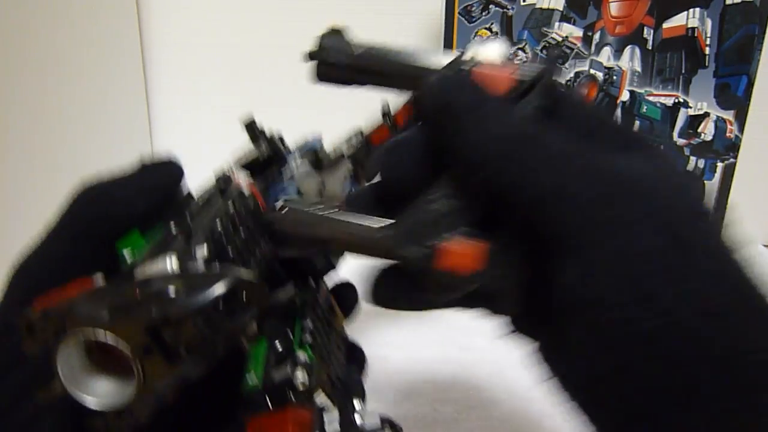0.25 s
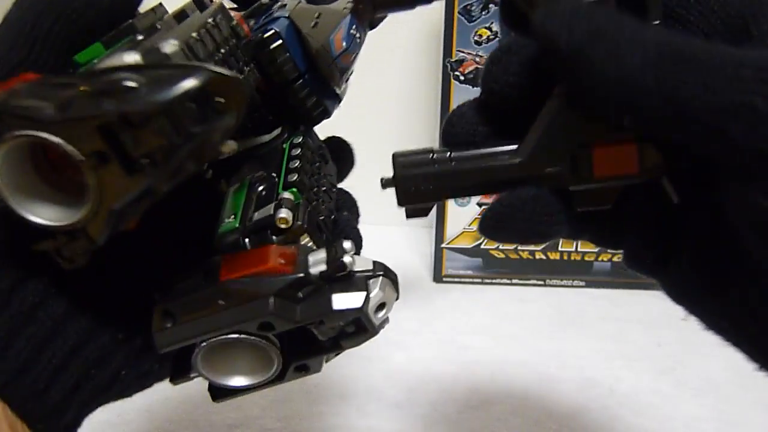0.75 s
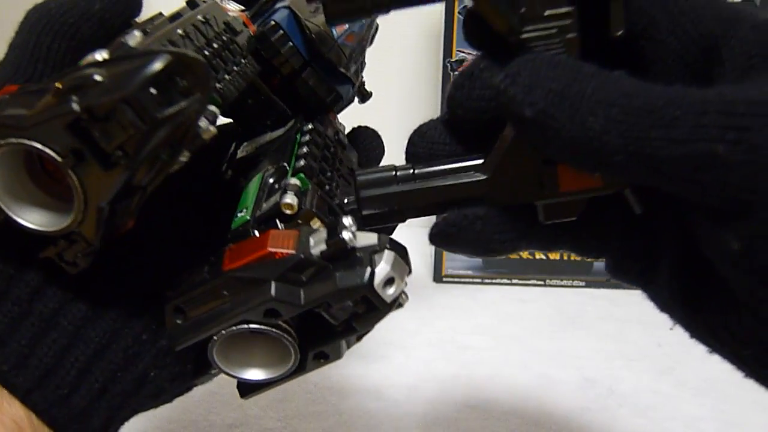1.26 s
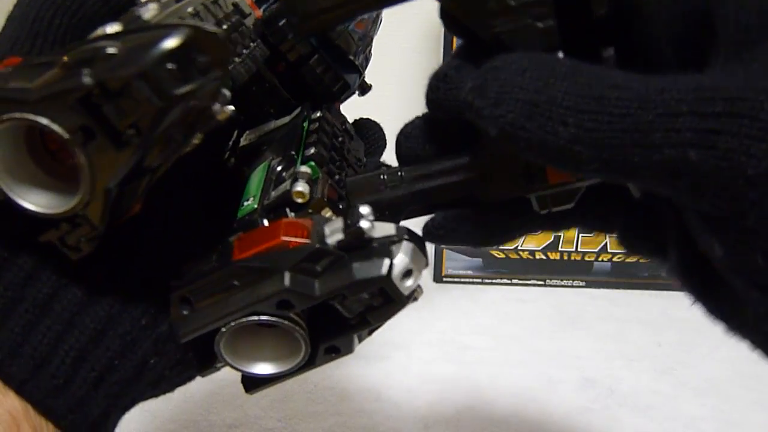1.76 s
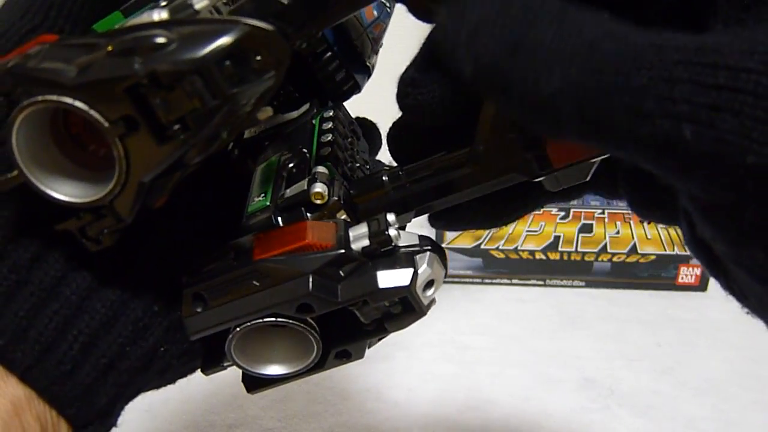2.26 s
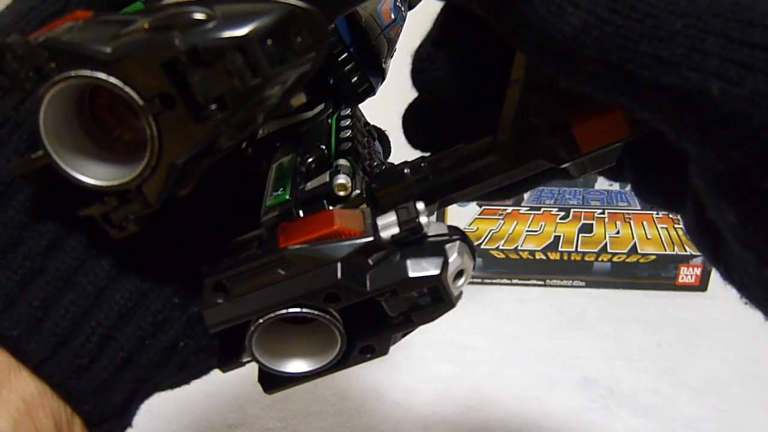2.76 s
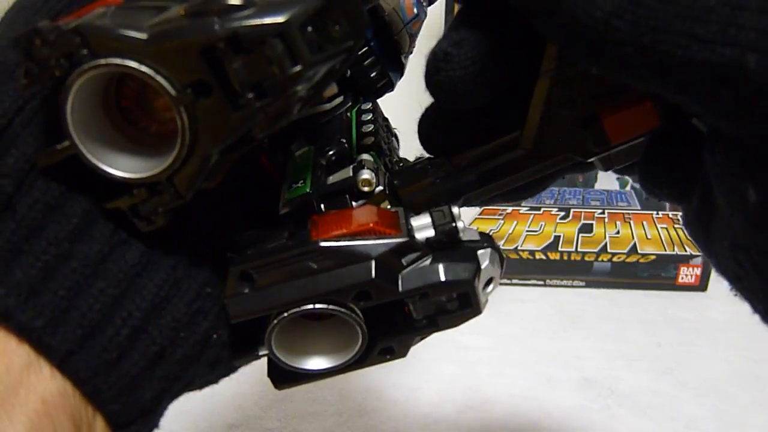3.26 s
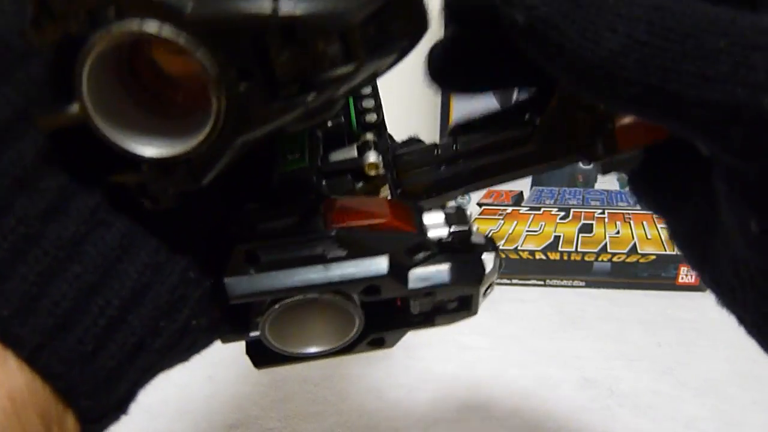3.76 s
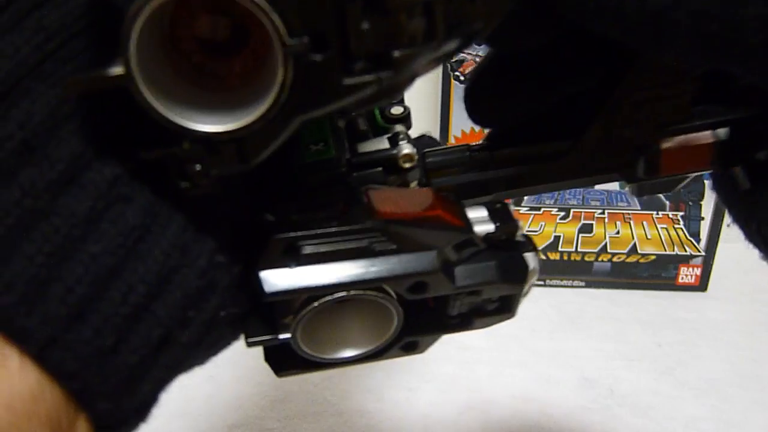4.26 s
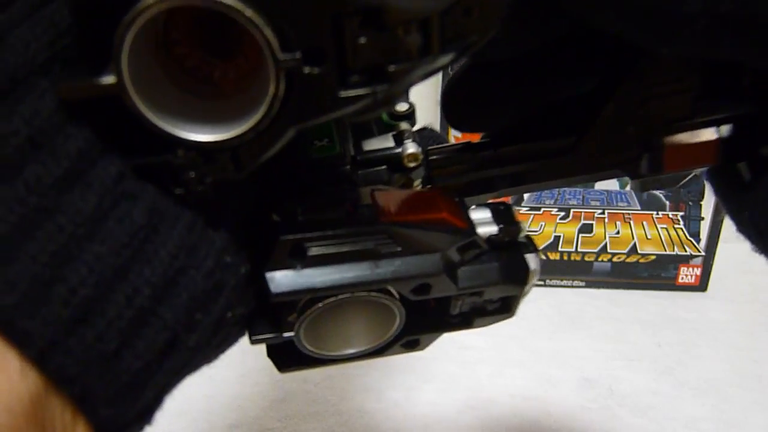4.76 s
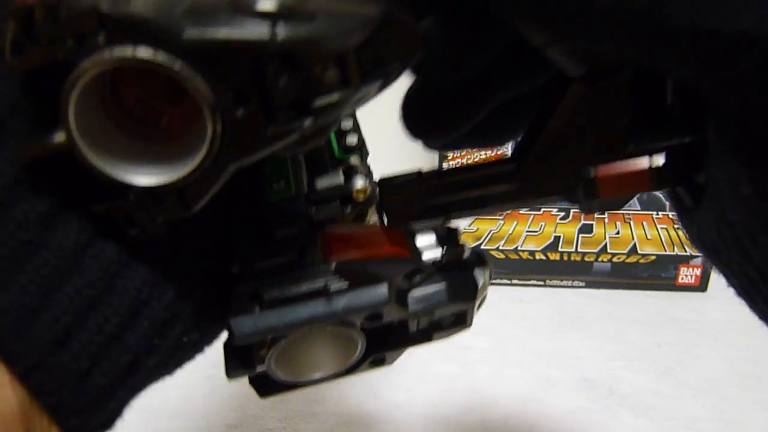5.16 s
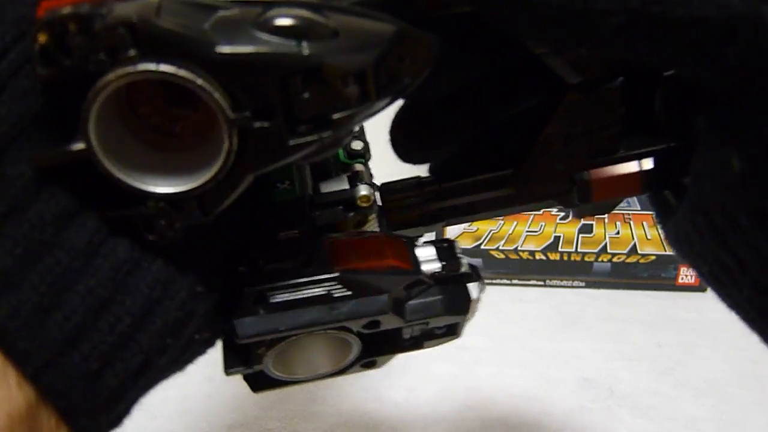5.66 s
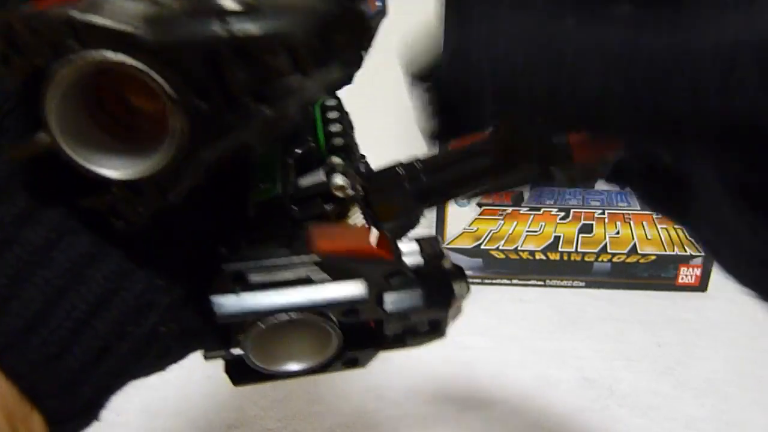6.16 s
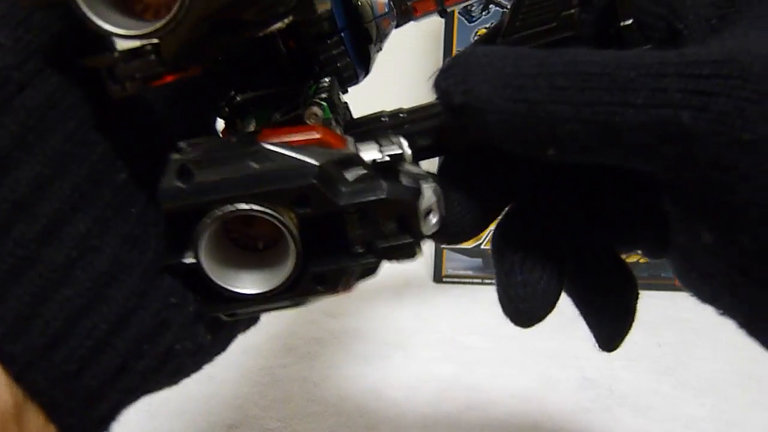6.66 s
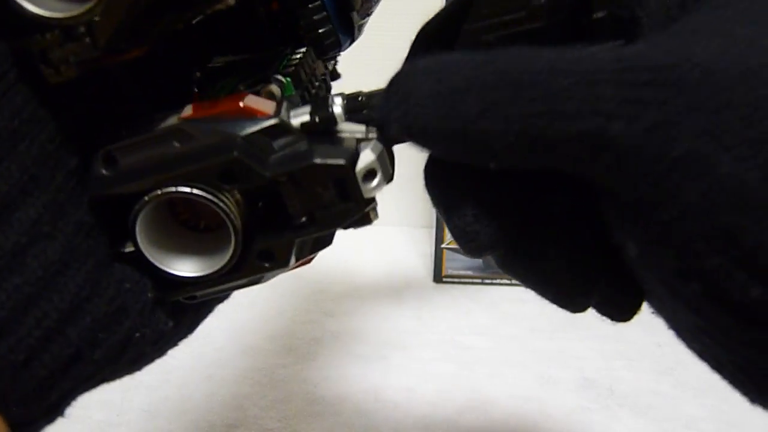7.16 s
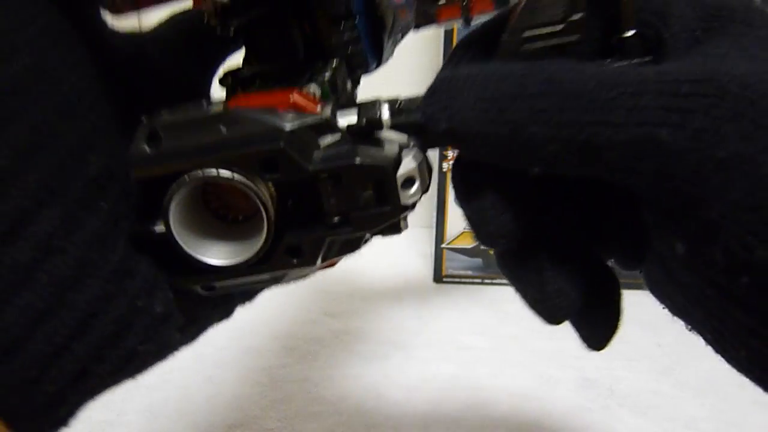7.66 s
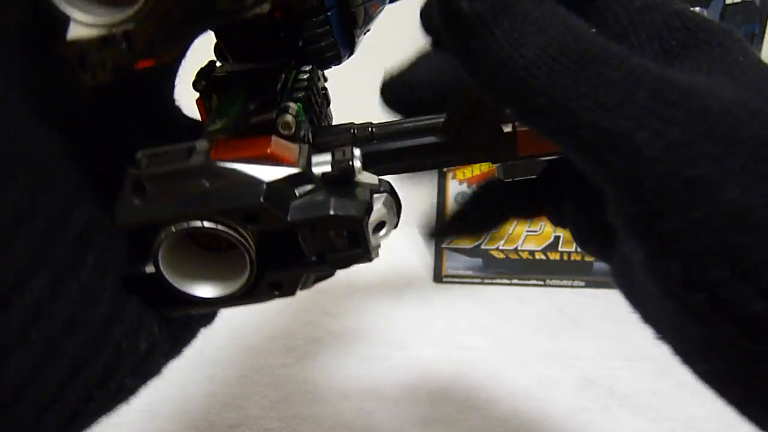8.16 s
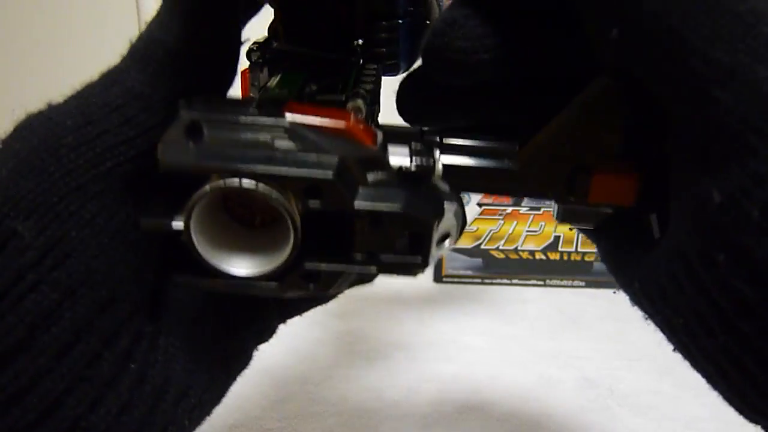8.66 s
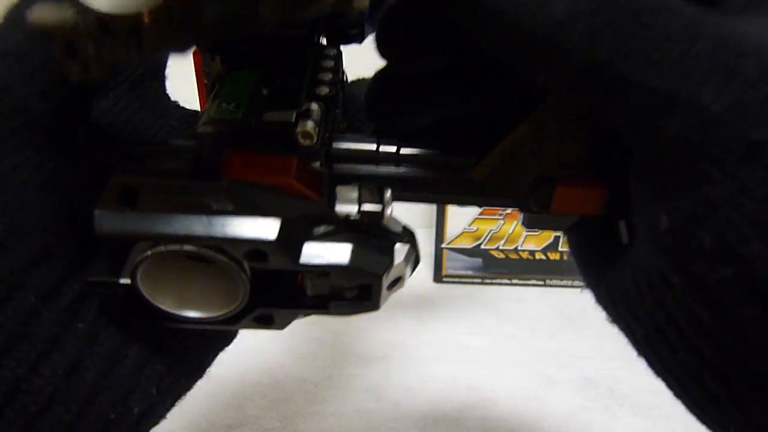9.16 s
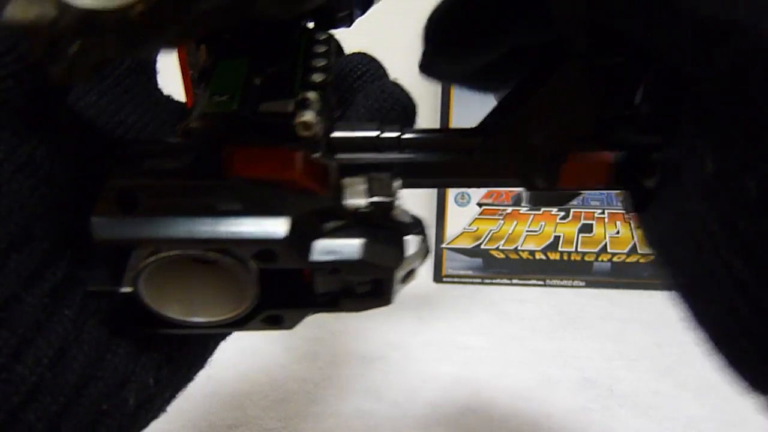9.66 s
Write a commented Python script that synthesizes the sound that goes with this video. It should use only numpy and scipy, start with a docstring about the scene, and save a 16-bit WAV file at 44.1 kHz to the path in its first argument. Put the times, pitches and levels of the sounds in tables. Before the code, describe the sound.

A hard plastic toy is fitted together by gloved hands, close to the microphone in a quiet room with little echo. It opens with a quick cluster of light clicks, then only scattered ticks, with faint swishes of knitted gloves around 0.5 and 2 seconds. From about 2.5 seconds pegs, hinges and panels click and snap in dense, irregular runs, each short and bright with a slightly hollow knock. Loose parts rattle, plastic rubs on plastic, and a few hard pushes add soft thumps. A sharp snap comes near 3 seconds, and the loudest, with a dull thump, at about 5.7 seconds. More strong snaps follow around 6.7 and 7.3 seconds. The handling thins out from 7.7 to 8.4 seconds, then the clicking resumes until about 10 seconds. Underneath, a faint muffled rumble swells now and then over steady room hush.

```python
"""A hard plastic toy is fitted together by gloved hands, close to a mono microphone in a quiet room.
Pegs, hinges and panels click and snap: each blow rings small stiff parts and a hollow shell, with
a bright crack on top. Hard pushes thump through the hands, loose parts rattle, plastic rubs on
plastic and knitted gloves swish. A muffled low rumble swells now and then over the room's hush."""
import sys
import numpy as np
from scipy import signal
from scipy.fft import rfft, irfft
from scipy.io import wavfile
from scipy.ndimage import uniform_filter1d

SR = 44100
rng = np.random.default_rng(int(sys.argv[2]) if len(sys.argv) > 2 else 0)


def transcribe(signal):
    """Save signal, clipped to [-1, 1], as a 16-bit WAV file at the path in sys.argv[1]."""
    frames = np.atleast_2d(signal).T
    limited = np.clip(frames, -1, 1)
    pcm = np.round(limited * 32767).astype(np.int16)
    wavfile.write(sys.argv[1], SR, pcm)


N = 437472

# How busy the hands are. Each row: time in seconds, level in dB, share of rattle against rub (0 to 1).
HANDLING_MOVES = [(0.0, -53.5, .6), (0.19, -50, 0.74), (0.47, -59.5, 0.07), (1.85, -58.5, 0.33),
                  (2.4, -55.5, 0.32), (2.8, -57.5, 0.24), (3.45, -44.5, 0.6), (3.7, -51, 0.48),
                  (4.6, -54, 0.57), (4.95, -39, 0.64), (5.33, -58, .4), (5.7, -40.5, 0.7), (5.85, -64, 0.4),
                  (6.08, -43, 0.5), (6.19, -53, 0.5), (6.3, -43.5, 0.56), (6.57, -49, .3), (6.95, -50, 0.5),
                  (7.13, -41, 1), (7.66, -44.5, 0.32), (7.79, -59, 0.44), (8.67, -49, 0.3),
                  (9.36, -55, 0.55), (9.92, -47, 0.4)]
# The tone of plastic rubbing on plastic. Each row: frequency in Hz, relative level in dB.
RUB_SPECTRUM = [(300, -55), (700, 0.5), (1300, 0.5), (3000, -5), (5000, -11.5), (9000, -13), (16000, -16.5)]
# The ring of small stiff parts. Each row: pitch in Hz, relative level in dB, 60 dB decay in seconds.
PART_RINGS = [(2580, 7, 0.0072), (3250, 3, 0.032), (3430, -2, 0.0061), (3950, -7, 0.075), (4250, -2, 0.074),
              (4520, -1, 0.034), (5000, -5, 0.062), (5330, 6, 0.0082), (5800, -3, 0.036), (6155, -4, 0.02),
              (6645, 2, 0.021), (7260, 7.5, 0.0065), (8184, 11, 0.0042)]
# The ring of hollow shells. Each row: pitch in Hz, relative level in dB, 60 dB decay in seconds.
SHELL_RINGS = [(650, -19, 0.14), (780, -3.5, 0.038), (960, -2.5, 0.11), (1150, -10, 0.069),
               (1352, 3.5, 0.033), (1530, 3.5, 0.11), (1815, 5.5, 0.069)]
# The tone of the quiet room. Each row: frequency in Hz, relative level in dB.
HUSH_SPECTRUM = [(12, -31), (20, -8), (53, -0.5), (156, -0.5), (251, 2), (305, 3), (428, -3), (465, -2),
                 (729, -3), (1950, -14), (2120, -20.5), (3330, -29), (15200, -24), (16500, -72)]
# Plastic clicks. Each row: start in seconds, level in dB, ring pitch in Hz, shell level in dB against
# the ring, shell pitch in Hz, crack level in dB against the ring, nominal decay in seconds.
CLICK_HITS = [(0.042, -29.5, 4200, 3, 1350, 0, 0.015), (0.0498, -30, 3430, -3, 1240, 0, 0.11),
              (0.078, -20.5, 5150, -10, 1350, -6, 0.021), (0.1372, -25.5, 5500, 2, 1150, -12, 0.057),
              (0.1592, -22.5, 5800, -24, 1110, -3, 0.036), (0.164, -25.5, 4520, -13, 1600, -11, 0.067),
              (0.182, -18, 7640, -7, 1290, 3, 0.02), (0.1913, -25, 3660, -26, 1260, -3, 0.048),
              (0.306, -31, 3520, -19, 1450, -6, 0.016), (0.4961, -29.5, 3950, -13, 970, -8, 0.0049),
              (0.796, -30, 3760, -28, 650, -14, 0.029), (1.435, -18.5, 4780, -16, 1240, -10, 0.017),
              (1.444, -28.5, 2880, -15, 1520, -13, 0.036), (1.558, -27.5, 3950, -4.5, 1610, -18, 0.051),
              (2.0368, -16.5, 4320, -18.5, 1490, 1.5, 0.0055), (2.3733, -25, 2890, -21, 1420, -11, 0.017),
              (2.4999, -20, 3870, -22, 1050, -10, 0.009), (2.5078, -24, 3020, -20, 1420, -23, 0.015),
              (2.551, -24, 3880, -22, 915, -7, 0.016), (2.5763, -28.5, 3780, -15, 650, -23, 0.016),
              (2.6117, -14, 5700, -12.5, 1230, -10, 0.022), (2.6442, -19.5, 5160, -13, 1010, 5, 0.0091),
              (2.6493, -20.5, 7100, -16, 1020, -10, 0.029), (2.9032, -28, 4900, -15, 1490, 2, 0.048),
              (2.9076, -17.5, 4440, -25, 1260, -3, 0.0065), (2.9391, -6, 5800, -13.5, 743, -3, 0.03),
              (2.9906, -16.5, 5970, -32, 1530, 3, 0.0066), (3.0086, -20, 2590, -14, 1530, -30, 0.044),
              (3.016, -26, 4960, -11, 1430, -8, 0.016), (3.0228, -18, 5800, -30, 1500, -4, 0.02),
              (3.0419, -15, 6300, -31, 1350, 1.5, 0.0041), (3.1098, -22.5, 5680, -14, 1520, -10, 0.012),
              (3.1173, -21.5, 7460, -9, 1320, -12, 0.016), (3.1256, -12, 6050, -24, 1070, -9, 0.0068),
              (3.138, -22.5, 4000, -15, 1460, 1, 0.012), (3.172, -20, 2550, -10, 1140, -11, 0.0066),
              (3.221, -20, 6000, -22, 1470, 1, 0.011), (3.255, -20, 4920, -9, 1060, -9, 0.017),
              (3.2696, -18, 6300, -13, 705, -4, 0.013), (3.2944, -12.5, 2970, -21, 1240, 1, 0.0082),
              (3.3319, -15, 4840, -15, 1410, -4, 0.014), (3.3544, -23.5, 6270, -18, 1390, 2, 0.012),
              (3.3776, -32, 4010, -29, 1200, 4, 0.014), (3.3944, -13, 3250, -12.5, 725, -42, 0.025),
              (3.4403, -20.5, 6000, -21, 1460, -4, 0.0064), (3.4539, -11, 4030, -21, 1530, -1, 0.0031),
              (3.472, -17, 4970, -9.5, 1530, -13, 0.026), (3.492, -14, 4840, -17, 1250, -7, 0.007),
              (3.5086, -19.7, 4760, -15, 1400, -7, 0.008), (3.5196, -21, 4870, -14, 1450, -9, 0.0077),
              (3.5265, -19, 6800, -27, 1400, -2, 0.0083), (3.531, -23, 7500, -20, 1570, -10, 0.017),
              (3.5624, -17.5, 3880, -35, 1450, 3.5, 0.0075), (3.5674, -19.5, 3050, -15, 1410, -9, 0.014),
              (3.5854, -24, 4460, -8.5, 1500, -9, 0.024), (3.6, -6.5, 7700, -28, 1290, -12, 0.0085),
              (3.609, -10, 3540, -28, 810, -14, 0.0074), (3.6171, -13, 5800, -27, 780, -0.5, 0.006),
              (3.622, -19.5, 5460, -24, 780, -2, 0.0074), (3.6261, -22, 5460, -19, 1280, -12, 0.025),
              (3.6714, -16.5, 3950, -14.5, 1080, -0.5, 0.017), (3.7317, -31, 5140, -4, 1280, -12, 0.019),
              (3.8574, -33.5, 4540, -5, 640, -20, 0.056), (3.8834, -29, 5000, -0.5, 1650, -12, 0.041),
              (3.893, -11.5, 4880, -16, 960, -6, 0.015), (3.9024, -12, 6440, -12.5, 1100, -16, 0.023),
              (3.9695, -14.5, 4670, -14, 910, -20, 0.015), (3.983, -21.5, 5800, -7.5, 1020, -8, 0.014),
              (4.0591, -26, 6000, -5.5, 1060, -9, 0.014), (4.223, -34, 3260, -4.5, 960, -28, 0.0091),
              (4.2926, -42, 6060, -17, 690, 12, 0.006), (4.3641, -15, 4900, -15.5, 1210, -4, 0.0069),
              (4.4096, -21, 7100, -14, 1290, -17, 0.014), (4.464, -8.5, 5370, -29, 1370, -11.5, 0.0061),
              (4.501, -20, 3020, -13.5, 1070, -1.5, 0.036), (4.533, -20, 2800, -6.5, 1360, -7, 0.02),
              (4.5934, -20, 5000, -15.5, 1440, -5, 0.0089), (4.6261, -19.5, 4900, -7.5, 1240, -6, 0.02),
              (4.6367, -10.2, 4900, -22, 1510, -0.5, 0.018), (4.6782, -26.5, 4080, -15, 1350, -3, 0.013),
              (4.7056, -11, 5700, -41, 690, -8, 0.0043), (4.7469, -19.5, 6700, -26, 1320, -3, 0.005),
              (4.7577, -20, 7660, -13.5, 1080, -11, 0.022), (4.781, -20, 4440, -14, 825, -8, 0.0049),
              (4.8044, -14.5, 5400, -28, 615, -9, 0.0069), (4.825, -26, 5560, -7, 1390, -5, 0.013),
              (4.8455, -25.5, 3500, -6, 600, -12, 0.012), (4.905, -22.5, 6200, -11, 1300, -5, 0.011),
              (4.937, -11, 4930, -19, 800, -12, 0.0057), (4.9403, -15, 4030, -16.5, 930, -15, 0.006),
              (4.944, -22, 5000, -10, 1250, -7, 0.013), (4.9852, -16, 3430, -23, 600, 0, 0.0058),
              (4.993, -26, 4890, -5.5, 850, -5, 0.027), (5.055, -27, 4400, -6.5, 606, 5.5, 0.013),
              (5.0736, -13, 3950, -30, 1080, -9, 0.0074), (5.0756, -24, 4900, -14, 1080, -13, 0.029),
              (5.0937, -26.5, 4070, -4.5, 676, -12, 0.031), (5.116, -25, 5000, -10, 1190, -10, 0.031),
              (5.197, -19, 4030, -9.5, 1080, -6, 0.046), (5.205, -17, 6430, -9, 1400, -5, 0.03),
              (5.2108, -20.5, 3430, -12, 1430, -11, 0.035), (5.2421, -17.5, 7700, -19, 1180, -16, 0.0089),
              (5.3017, -26.0, 5000, -19, 800, -15, 0.012), (5.3126, -16.5, 5440, -32, 1450, -11, 0.02),
              (5.32, -20, 4200, -18, 1500, -3, 0.0089), (5.3307, -24.5, 5300, -13, 1250, -5, 0.01),
              (5.3575, -25, 5030, -14, 930, -1, 0.0082), (5.37, -16, 5800, -9.5, 1030, -5, 0.019),
              (5.377, -13.5, 7850, -22, 1420, -15, 0.017), (5.384, -24.5, 2920, -12, 950, -12, 0.045),
              (5.4587, -28.5, 5470, -28, 930, -14, 0.0063), (5.478, -17.5, 5800, -26, 940, -5, 0.015),
              (5.485, -13, 5300, -31, 940, -19, 0.0056), (5.4908, -21, 4530, -16, 870, 0, 0.012),
              (5.5224, -15, 5330, -24, 1480, -13, 0.0066), (5.528, -19.5, 5100, -9, 1450, -1.5, 0.011),
              (5.5875, -19, 6800, -21, 720, -4, 0.0083), (5.591, -15.5, 5240, -25, 780, -12, 0.0079),
              (5.6294, -17.5, 7140, -14, 1510, -3, 0.016), (5.6434, -24.3, 5160, -12, 1130, -13, 0.02),
              (5.6473, -12.5, 5300, -25, 1010, -5, 0.011), (5.6535, -20, 5300, -16, 800, -12, 0.01),
              (5.665, -23, 4600, -25, 1310, 1, 0.014), (5.671, -22, 5750, -32, 1150, -10, 0.016),
              (5.6775, -16, 5200, -20, 1490, -6, 0.012), (5.6829, 4.5, 3740, -11.5, 1315, -2.5, 0.0045),
              (5.6947, -23, 3790, -11, 900, 4, 0.032), (5.723, -26, 4430, -19, 1590, -9, 0.061),
              (5.7795, -25, 4530, -14, 1460, -13, 0.01), (5.902, -19, 5700, -32, 1110, -12, 0.01),
              (5.9152, -28, 4380, -14, 800, -10, 0.012), (5.9299, -24, 4500, -12.5, 1020, -10, 0.022),
              (5.9517, -19.5, 6900, -16, 910, -5, 0.021), (5.964, -18, 5790, -14, 1330, -5, 0.0087),
              (5.9823, -14, 7000, -21, 1450, -2, 0.0054), (5.9893, -16.5, 5800, -21, 1310, -4, 0.01),
              (6.005, -14, 4800, -25, 1310, -5, 0.02), (6.011, -24, 5700, -11, 1270, -7, 0.027),
              (6.0375, -20.5, 3240, -9, 1520, -35, 0.012), (6.0508, -16, 4700, -11, 1170, 6.5, 0.0044),
              (6.055, -11, 7750, -21, 1610, -14, 0.011), (6.0653, -32, 3200, 0.5, 1560, 0, 0.049),
              (6.1137, -22, 2950, -28, 1020, -2, 0.0098), (6.125, -22.5, 4800, -6, 1045, -0.5, 0.023),
              (6.217, -27, 4470, -15, 780, -15, 0.01), (6.23, -26.5, 6300, -7.5, 1500, -4, 0.029),
              (6.2765, -16.5, 3270, -13.5, 920, -29, 0.01), (6.347, -23, 4520, -17, 1530, -8, 0.011),
              (6.3913, -20.5, 7000, -13, 1380, -9, 0.024), (6.4228, -11.5, 6400, -21, 1580, -7, 0.0089),
              (6.4498, -23.5, 2580, -10, 1240, -6, 0.022), (6.479, -17.5, 3000, -13.5, 1040, -13, 0.013),
              (6.4907, -23, 7000, -13, 1490, -12, 0.028), (6.5177, -22.5, 3700, -15, 1340, -3, 0.012),
              (6.6029, -26, 2960, -15, 1540, -1, 0.02), (6.6383, -29.5, 3240, -10, 815, -21, 0.021),
              (6.666, -30, 3690, -10, 1050, 1, 0.052), (6.6854, -9.5, 5700, -24, 1650, -3.5, 0.0033),
              (6.7007, -21, 3970, -18, 910, 1, 0.023), (6.731, -8, 5650, -3.5, 874, -6.5, 0.019),
              (6.7425, -8.5, 4300, -9, 1530, -14, 0.0069), (6.2475, -28, 3160, -4, 1530, -13, 0.045),
              (6.8098, -22, 3550, -10, 1470, 3, 0.0079), (6.8202, -13, 5600, -18, 760, -4, 0.01),
              (6.8903, -23, 5960, -11, 1440, -8, 0.0069), (6.9026, -24, 5170, -9, 1680, -8, 0.059),
              (6.955, -20, 5440, -28, 1180, 1, 0.0091), (6.993, -12, 5800, -21, 1700, -9, 0.016),
              (7.0049, -18.5, 4670, -16, 1580, -13, 0.017), (7.0115, -28.5, 4320, 1, 1810, -10, 0.032),
              (7.0494, -17.5, 7750, -16, 1070, -2, 0.0085), (7.0781, -26, 3300, -6, 1800, -2, 0.012),
              (7.111, -22.5, 3510, -7.5, 1570, -5, 0.049), (7.1325, -9, 5800, -39, 1320, -10, 0.0051),
              (7.143, -10.5, 4680, -12.5, 774, 1, 0.0044), (7.1582, -18.5, 4700, -13, 890, -6, 0.016),
              (7.1745, -24, 5430, -14, 680, -5, 0.02), (7.18, -16.5, 5600, -14, 1570, -10, 0.011),
              (7.1888, -16, 3950, -10.5, 1530, -2.5, 0.022), (7.1983, -17, 3600, -22, 1310, -7, 0.016),
              (7.2337, -11, 4620, -14, 690, -5, 0.0058), (7.2626, -7.5, 5530, -12.5, 1420, -8, 0.022),
              (7.279, -28, 4880, -11, 960, -3, 0.022), (7.333, -20.5, 7600, -34, 1230, 7, 0.012),
              (7.411, -18.5, 4430, -36, 940, -2, 0.0061), (7.4252, -26, 6900, -34, 1090, 6, 0.013),
              (7.4526, -19.5, 5720, -17, 1090, -9, 0.012), (7.4617, -25, 4600, -7.5, 1290, -4, 0.019),
              (7.47, -16.5, 4830, -31, 1460, -10, 0.0082), (7.4767, -18, 6800, -17, 1500, -11, 0.0081),
              (7.4843, -16, 3000, -16, 1430, -7, 0.011), (7.497, -23, 2600, -13, 1480, -15, 0.027),
              (7.538, -23, 5500, -10, 1590, -3, 0.015), (7.5492, -25.5, 3100, -5, 1200, -7, 0.023),
              (7.6218, -25, 4360, -7.5, 1530, -2, 0.0057), (8.1535, -26.5, 3540, -7, 1230, -12, 0.015),
              (8.3158, -27.5, 4560, -10, 1530, -5.5, 0.017), (8.4586, -22, 4000, -21, 1540, -1, 0.017),
              (8.58, -23.5, 4520, -8.5, 1530, -6, 0.018), (8.6182, -20, 6240, -19, 1520, -2, 0.016),
              (8.6382, -27, 2720, -8, 960, -17, 0.02), (8.6713, -26.5, 4420, -7, 1530, -9, 0.016),
              (8.7036, -13.5, 4800, -18, 870, -11, 0.0076), (8.746, -13.5, 4840, -13, 780, -7.5, 0.017),
              (8.839, -24.5, 4240, -12.5, 1430, -7.5, 0.017), (9.146, -34, 4400, -2.5, 865, -14, 0.014),
              (9.243, -39.5, 4320, 3, 1530, -14, 0.02), (9.3094, -32, 4470, -10, 1530, -8, 0.012),
              (8.891, -20, 4530, -22, 600, -3.5, 0.0063), (8.921, -20, 7480, -11, 1580, -17, 0.023),
              (8.9248, -15.5, 4250, -11, 1530, 5, 0.0065), (8.9896, -24, 2600, -5, 1050, -32, 0.0084),
              (9.0353, -19, 4500, -12.5, 1530, -9, 0.016), (9.0777, -29, 4530, -4.5, 1530, -17, 0.017),
              (9.1093, -29.5, 4540, -5, 1530, -27, 0.029), (9.287, -20, 4560, -8.5, 1610, -13, 0.019),
              (9.3272, -28.5, 5570, -23, 700, -3, 0.0081), (9.3766, -10.5, 4170, -18, 1530, 0.5, 0.012),
              (9.5313, -31, 4520, -5, 1530, -23, 0.024), (9.5412, -19.5, 4560, -8, 1580, -5.5, 0.017),
              (9.5589, -24.5, 4460, -7, 1530, -23, 0.015), (9.6394, -26.5, 3100, -11, 1100, -11, 0.025),
              (9.663, -25, 5040, -11, 1080, -7, 0.011), (9.674, -20.5, 4750, -15, 1000, -5, 0.015),
              (9.694, -11.5, 6430, -15, 1120, -5.5, 0.011), (9.7239, -15.5, 6740, -25, 1550, -10, 0.011),
              (9.7366, -22.5, 6670, -17, 864, -1, 0.012), (9.775, -18.5, 4250, -16, 1410, -8, 0.012),
              (9.8361, -20, 4840, -14, 1530, -6, 0.0071), (9.854, -22, 4000, -13, 1430, -0.5, 0.0068),
              (9.8595, -20.5, 4340, -10, 1520, -8, 0.0066), (9.874, -25.5, 6100, -25, 1370, -8, 0.022),
              (9.896, -26.5, 7700, -7, 1540, -10, 0.012), (9.909, -23, 4590, -29, 1130, -9, 0.0069)]
# Hard pushes. Each row: start in seconds, peak in dB, pitch in Hz, 60 dB decay in seconds (0.02 at least).
HARD_PUSHES = [(0.134, -44, 392, 0.04), (2.939, -35.5, 109, 0.05), (3.893, -32.5, 364, 0.052),
               (5.6818, -16.5, 173, 0.013), (6.729, -36, 140, 0.049), (7.261, -32, 372, 0.042),
               (8.748, -40, 370, 0.064), (9.375, -34, 600, 0.02)]
# Glove strokes. Each row: start, rise, hold and fall in seconds, then level in dB.
GLOVE_STROKES = [(0.393, 0.035, 0.14, 0.091, -61), (0.63, 0.022, 0.16, 0.11, -57.5),
                 (2.13, 0.055, 0.11, 0.03, -56.5)]
# The tone of a sliding glove. Each row: frequency in Hz, relative level in dB.
GLOVE_SPECTRUM = [(1500, -34), (3000, 12), (4200, 17.5), (5500, 16), (8000, 13.5), (12000, 13), (16000, 3)]
# Rumble swells. Each row: crest time in seconds, hold in seconds, level in dB, lower band's pitch in Hz.
RUMBLE_SWELLS = [(0.525, 0.055, -44, 260), (1.935, 0.44, -53.5, 228), (3.557, 0.42, -55.5, 232),
                 (4.827, 0.44, -48.5, 230), (6.22, 0.41, -53, 232), (7.467, 0.34, -48.5, 229),
                 (8.164, 0.22, -49.5, 258), (9.0, 0.35, -58.5, 229), (9.71, .25, -52, 263)]
# How the room dies away. Each row: frequency in Hz, 60 dB decay in seconds.
ROOM_DECAY = [(300, 0.16), (1500, 0.26), (4000, 0.17), (9000, 0.16), (15000, 0.024)]


def gain_of(db):
    """Decibels to gain."""
    return 10 ** (np.asarray(db) / 20)


def decay(t, t60):
    """A fade that loses 60 dB every t60 seconds."""
    return gain_of(-60 * t / t60)


def unit_rms(x):
    """Scales to rms 1."""
    return x / np.sqrt(np.mean(x ** 2) + 1e-20)


def unit_peak(x):
    """Scales each row to peak 1."""
    return x / (abs(x).max(-1, keepdims=True) + 1e-12)


def value_at(points, hz):
    """Reads a table on a log-frequency axis."""
    f, value = np.transpose(points)
    return np.interp(np.log(hz + 1), np.log(f + 1), value)


def coloured(x, spectrum):
    """Shapes x with an EQ curve, at rms 1."""
    eq = gain_of(value_at(spectrum, np.fft.rfftfreq(len(x), 1 / SR)))
    return unit_rms(irfft(rfft(x) * eq, len(x)))


def filtered(x, kind, hz, order):
    """A Butterworth filter along each row."""
    return signal.sosfilt(signal.butter(order, hz, kind, fs=SR, output="sos"), x)


def resonate(x, hz, width_hz):
    """A resonance that can glide: shifts hz down to zero, smooths twice and shifts back."""
    carrier = np.exp(2j * np.pi * np.cumsum(hz * np.ones(len(x))) / SR)
    pole = np.exp(-np.pi * width_hz / SR)
    return unit_rms((carrier * signal.lfilter([1], [1, -2 * pole, pole * pole], x / carrier)).real)


def placed(times, sounds):
    """Lays each sound down at its time."""
    mix = np.zeros(N + sounds.shape[1])
    for start, sound in zip(times, sounds):
        mix[round(start * SR):][:len(sound)] += sound
    return mix[:N]


def ringing(modes, pitch_hz, t, db_per_octave, max_cut_db, scatter_db):
    """Each blow lands elsewhere: it favours modes near its pitch, with chance strengths and phases."""
    hz, db, t60 = np.transpose(modes)[:, :, None]
    cut_db = np.minimum(db_per_octave * abs(np.log2(hz.T / pitch_hz[:, None])), max_cut_db)
    luck, phase = rng.standard_normal((2,) + cut_db.shape)
    weight = gain_of(db.T - cut_db + scatter_db * luck) * np.exp(2j * phase)
    return unit_peak((weight @ (decay(t, t60) * np.exp(2j * np.pi * hz * t))).real)


def plastic_hits(ring_hz, shell_db, shell_hz, crack_db, decay_s):
    """One blow a row: stiff parts ring and clack, the hollow shell knocks, a bright crack tops it."""
    t, hz = np.arange(2000) / SR, np.fft.rfftfreq(2000, 1 / SR)
    parts = ringing(PART_RINGS, ring_hz, t, db_per_octave=90, max_cut_db=17, scatter_db=3)
    shell = ringing(SHELL_RINGS, shell_hz, t, db_per_octave=94, max_cut_db=23.4, scatter_db=3.5)
    noise = rng.standard_normal((len(decay_s), len(t)))
    grip = decay(t, np.clip(decay_s, 0.005, 0.1)[:, None])  # fingers damp the ring
    snap = decay(t, np.clip(1.255 * decay_s, 0.003, 0.1)[:, None])
    attack = 1 - np.exp(-(t / 0.00014) ** 2)
    shell_attack = 1 - np.exp(-t / 0.00032)

    spread_octaves = 0.59 * gain_of(0.16 * crack_db)[:, None]  # a harder blow spreads wider
    clack = irfft(rfft(noise) / (1 + (np.log2((hz + 1) / ring_hz[:, None]) / spread_octaves) ** 4))
    mids = unit_peak(attack * (parts * grip ** 0.52 + 0.53 * unit_peak(clack * snap)))
    buzz = filtered(noise[::-1], "band", [2500, 9000], order=1)  # loose neighbours buzz on after the blow
    mids += 10.2 * decay_s[:, None] * unit_peak(buzz * grip ** 0.08 * (1 - t / t[-1]))

    knock = filtered(noise[:, ::-1], "band", [450, 1900], order=2)
    lows = unit_peak(shell_attack * (shell * grip ** 0.43 + 0.54 * unit_peak(knock * np.sqrt(snap))))

    crack = filtered(noise, "high", 7800, order=4)
    crack = filtered(crack, "low", 11000, order=1)
    crack += 0.28 * signal.lfilter(*signal.iirpeak(14300, Q=10, fs=SR), crack)
    highs = unit_peak(attack * crack * snap)
    return mids + gain_of(shell_db)[:, None] * lows + gain_of(crack_db)[:, None] * highs


def rattle_and_rub(variants=12, ticks_per_s=400):
    """Loose parts tick at random over the grit of plastic rubbing on plastic."""
    luck = rng.random((5, variants))
    ticks = plastic_hits(ring_hz=2700 * 2 ** (1.34 * luck[0]),
                         shell_db=-18 + 10 * luck[1], shell_hz=700 + 1100 * luck[4],
                         crack_db=-8 + 4.9 * luck[2], decay_s=0.0038 + 0.0046 * luck[3])
    strength = gain_of(4.6 * np.minimum(rng.exponential(1, N), 3))
    impacts = strength * (rng.random(N) < ticks_per_s / SR)
    variant = rng.integers(0, variants, N)
    rattle = sum(signal.oaconvolve(impacts * (variant == k), ticks[k, :600])[:N] for k in range(variants))
    grit = gain_of(3.3 * unit_rms(uniform_filter1d(rng.standard_normal(N), 150)))
    rub = coloured(grit * rng.standard_normal(N), RUB_SPECTRUM)
    t = np.arange(N) / SR
    times, db, rattle_share = np.transpose(HANDLING_MOVES)
    loose = np.interp(t, times, rattle_share)
    return gain_of(np.interp(t, times, db)) * (loose * unit_rms(rattle) + (1 - loose) * rub)


def room_hush(level_db=-56):
    """Steady, dark room tone."""
    return gain_of(level_db) * coloured(rng.standard_normal(N), HUSH_SPECTRUM)


def clicks():
    """Pegs, hinges and panels snap into place."""
    start, db, *timbre = np.transpose(CLICK_HITS)
    return placed(start, gain_of(db)[:, None] * plastic_hits(*timbre))


def thumps():
    """Hard pushes thump through the hands: a low damped tone roughened with noise."""
    start, db, hz, t60 = np.transpose(HARD_PUSHES)[:, :, None]
    t = np.arange(5000) / SR
    rough = filtered(rng.standard_normal((len(start), len(t))), "band", [60, 1100], order=2)
    push = np.sin(2 * np.pi * hz * t) + 0.38 * rough / rough.std()
    return placed(start[:, 0], gain_of(db) * unit_peak(push * decay(t, np.clip(t60, 0.02, 0.3))))


def glove_swishes():
    """Knitted gloves slide over the parts with a soft hiss; a trace stays between strokes."""
    t = np.arange(N) / SR
    strokes = sum(gain_of(db) * np.interp(t, start + np.cumsum([0, rise, hold, fall]), [0.13, 1, 0.85, 0.16])
                  for start, rise, hold, fall, db in GLOVE_STROKES)
    return strokes * coloured(rng.standard_normal(N), GLOVE_SPECTRUM)


def rumble(bed_db=-64, rise_s=0.05, sink_s=0.13, sag_to=0.72):
    """Muffled noise in two low bands: a faint bed with swells that rise, sag and sink."""
    t = np.arange(N) / SR
    crest, hold, level_db, hz = np.transpose(RUMBLE_SWELLS)
    swells = sum(gain_of(db) * np.interp(t, start + np.cumsum([0, rise_s, held, sink_s]), [0, 1, sag_to, 0])
                 for start, held, db in zip(crest - rise_s, hold, level_db))
    lower = resonate(rng.standard_normal(N), np.interp(t, crest + hold / 2, hz), width_hz=75)
    upper = resonate(rng.standard_normal(N), hz=430, width_hz=120)
    return np.maximum(swells, gain_of(bed_db)) * (lower + gain_of(-4) * upper)


def room_reverb(x, count=6):
    """Sparse room tails, each band dying at its own speed."""
    taps = np.zeros((count, SR // 3))
    grid = np.arange(60, SR // 3 - 10, 10)
    arrivals = grid + rng.integers(0, 10, (count, len(grid)))
    np.put_along_axis(taps, arrivals, rng.choice([-1., 1.], arrivals.shape), 1)
    hz, t, bands = signal.stft(taps, SR, nperseg=128)
    t60 = np.clip(value_at(ROOM_DECAY, hz), 0.03, 0.8)[:, None]
    tails = signal.istft(bands * decay(t, t60), SR, nperseg=128)[1]
    echoes = signal.oaconvolve(x[None], tails / np.linalg.norm(tails[0]), axes=1)[:, :N]
    # the tails crossfade quickly at random, so the decay sounds smooth, without ringing pitches
    weights = uniform_filter1d(rng.standard_normal((count, N // 32 + 1)), size=16)
    weights = np.repeat(weights, 32, axis=1)[:, :N]
    crossfade = uniform_filter1d(weights / np.linalg.norm(weights, axis=0), size=32)
    return (crossfade * echoes).sum(0)


def scene():
    """Toy and hands up close with a little room, over the rumble and hush."""
    toy = clicks() + thumps() + rattle_and_rub() + glove_swishes()
    hush = room_hush()
    return np.tile(toy + gain_of(-15) * room_reverb(toy) + rumble() + hush, (2, 1))


def record(dry, notch_hz=2110, shelf_hz=15800, cutoff_hz=16700):
    """The microphone housing cancels a narrow band; loud peaks clip; the top fades, then cuts off."""
    cosine = np.cos(2 * np.pi * notch_hz / SR)
    zero, pole = np.exp(-np.pi * 90 / SR), np.exp(-np.pi * 1100 / SR)
    x = signal.lfilter([1, -2 * zero * cosine, zero ** 2], [1, -2 * pole * cosine, pole ** 2], dry[0])
    x = np.clip(x, -0.8, 0.8)
    x = 0.17 * x + signal.oaconvolve(x, signal.firwin(255, shelf_hz, fs=SR), "same")
    x = signal.oaconvolve(x, signal.firwin(511, cutoff_hz, window=("kaiser", 9), fs=SR), "same")
    return np.tile(x, (2, 1))


dry = scene()
out = record(dry)
transcribe(out)
```